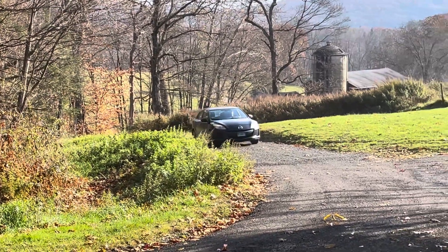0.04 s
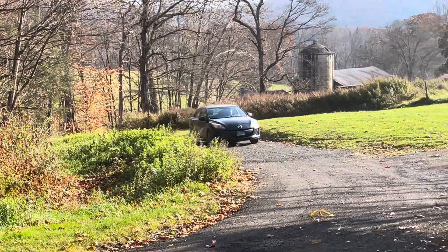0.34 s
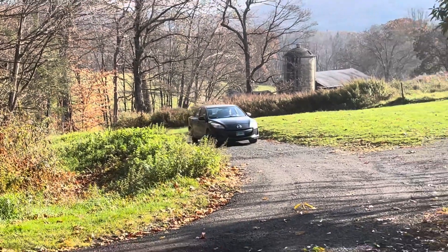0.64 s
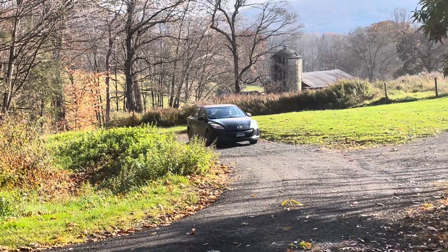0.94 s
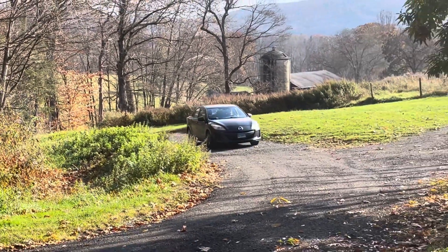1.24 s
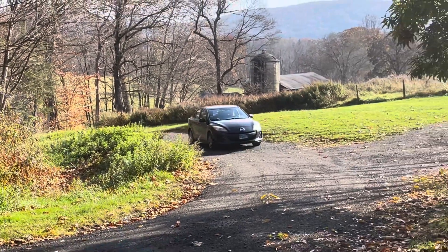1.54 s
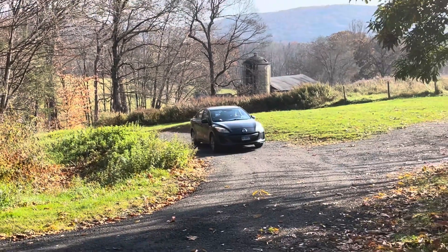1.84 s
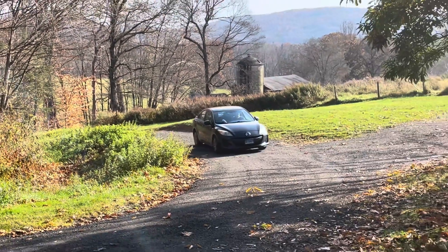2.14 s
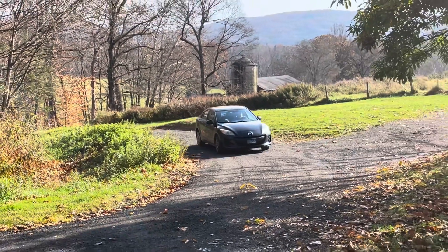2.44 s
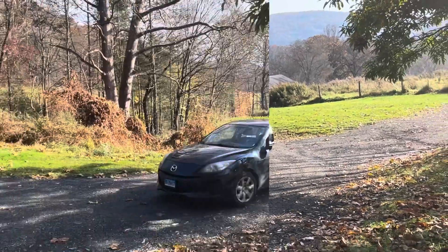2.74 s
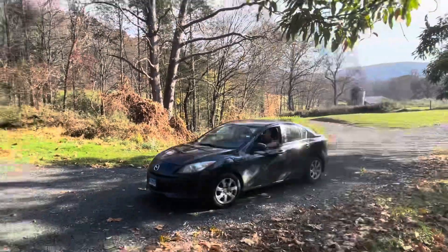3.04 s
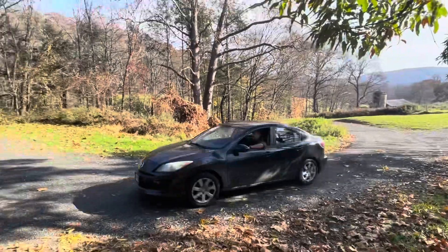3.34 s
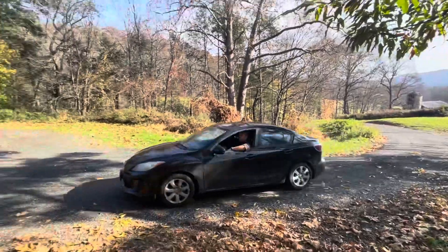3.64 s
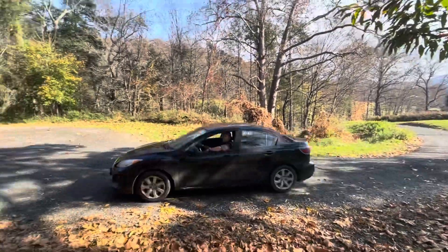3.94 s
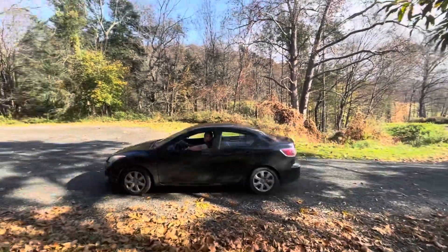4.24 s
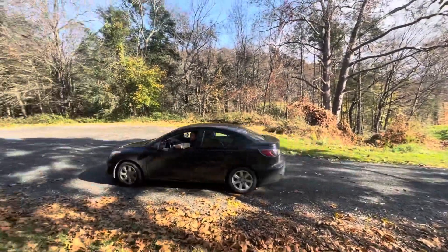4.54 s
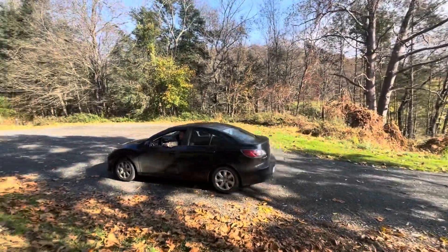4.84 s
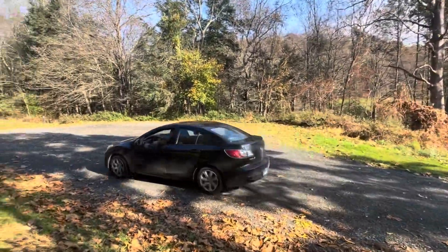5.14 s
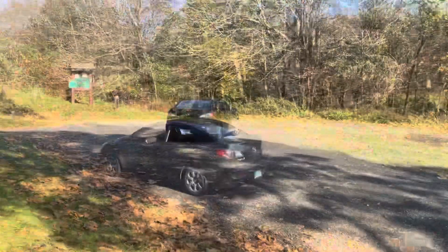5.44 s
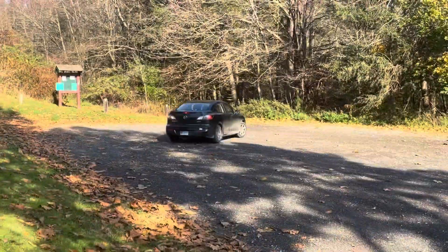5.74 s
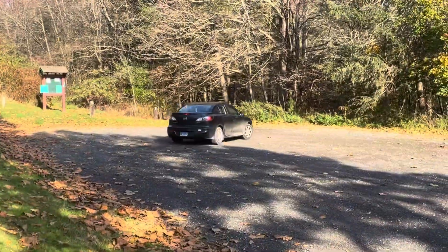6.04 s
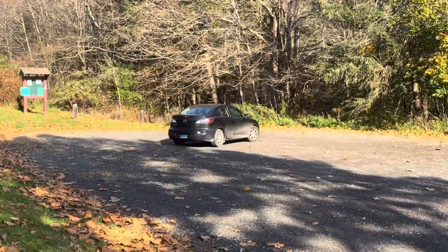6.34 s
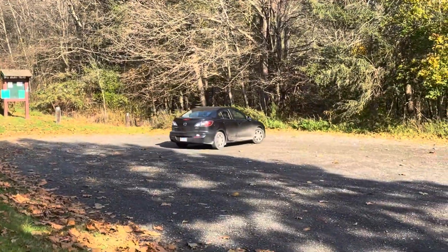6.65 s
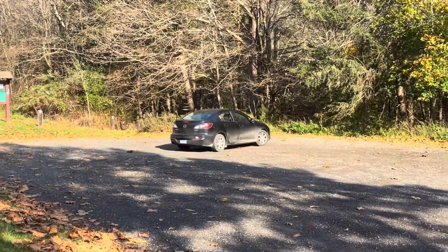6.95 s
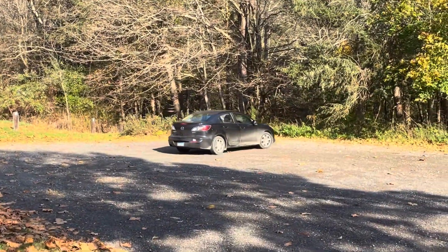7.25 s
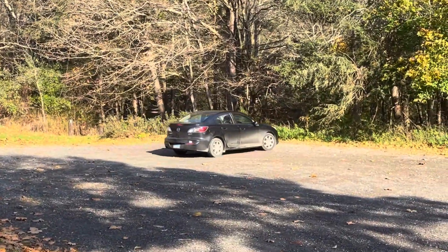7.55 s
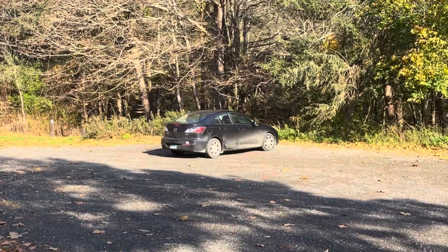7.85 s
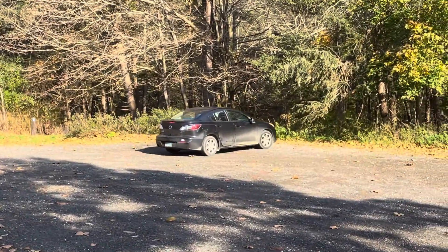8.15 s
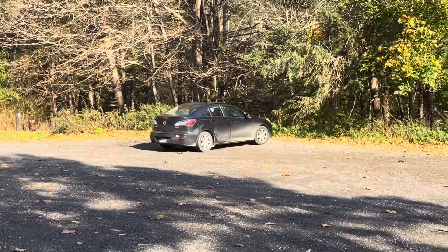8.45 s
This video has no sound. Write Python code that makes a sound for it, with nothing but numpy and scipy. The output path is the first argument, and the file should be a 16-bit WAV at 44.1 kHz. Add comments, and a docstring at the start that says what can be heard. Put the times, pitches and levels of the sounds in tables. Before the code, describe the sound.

Gravel crunches under the tyres of a slowly approaching car, with single stones popping out and scattering grit. The sound swells as the car passes close to the microphone at the side of a country drive, bringing sharp snaps, low tyre rumble, soft thuds and a low-revving engine. It then recedes to a soft, blurred grinding. Nearby trees return a slight echo, and a distant bird chirps briefly at the close.

```python
"""A small car creeps along a gravel drive in the country, heard in stereo from the verge.
It comes from afar, rolls close by the microphone about four seconds in, then draws away.
The tyres grind a bed of small stones and now and then pinch a big one until it pops out and scatters grit.
Under the crunch the tyres rumble and the engine hums at low revs. The trees return a faint echo,
and distant birds chirp at the end."""
import sys
import numpy as np
from scipy import signal
from scipy.fft import rfft, irfft
from scipy.io import wavfile

SR = 44100
rng = np.random.default_rng(int(sys.argv[2]) if len(sys.argv) > 2 else 0)


def to_wav(s):
    """Save 16-bit WAV."""
    ch = np.atleast_2d(s).T  # columns
    pcm = np.round(np.clip(ch, -1, 1) * 32767)  # PCM
    wavfile.write(sys.argv[1], SR, pcm.astype(np.int16))


N = 374850
TIME = np.arange(N) / SR
ABREAST_S = 4.03   # the car is level with the microphone
# how loudly the tyres work the gravel: time_s, level_db
TYRE_LEVEL = [(0.0, -47.5), (0.52, -47), (2.65, -47), (3.05, -36.5), (3.57, -35), (4.28, -34.5),
              (4.52, -35), (4.8, -38.5), (5.16, -35), (5.42, -43.5), (5.59, -47), (6.25, -48), (7.15, -51),
              (7.67, -49.5), (8.17, -53.5), (8.5, -54)]


def from_db(db):
    """Decibels to gain."""
    return 10 ** (np.asarray(db) / 20)


def rms_one(x):
    """Scale to unit power."""
    return x / np.sqrt(np.mean(x ** 2) + 1e-20)


def peak_one(x):
    """Scale to unit peak."""
    return x / (np.abs(x).max() + 1e-20)


def swell(centre_s, width_s):
    """A bell-shaped rise and fall."""
    return np.exp(-.5 * ((TIME - centre_s) / width_s) ** 2)


def follow(curve, time_s=TIME):
    """Value of a curve table at the given moments."""
    return np.interp(time_s, *np.transpose(curve))


def drift(rate_hz):
    """Slow random wander with a spread of 1."""
    step = 40
    pole = np.exp(-2 * np.pi * step * rate_hz / SR)
    slow = signal.lfilter([1], [1, -2 * pole, pole * pole], rng.standard_normal(N // step + 2002))[2000:]
    return np.interp(np.arange(N) / step, np.arange(len(slow)), rms_one(slow))


def band(x, edges_hz, kind="band", order=2):
    """Butterworth filter."""
    return signal.sosfilt(signal.butter(order, edges_hz, kind, fs=SR, output="sos"), x + 1e-18)


def colour(x, points):
    """Minimum-phase filter that follows points of frequency_hz, gain_db."""
    size = 8192
    hz, db = np.transpose(points)
    grid = np.maximum(np.arange(size // 2 + 1) * SR / size, 1)
    cepstrum = irfft(np.log(from_db(np.interp(np.log(grid), np.log(hz), db))))
    cepstrum[1:size // 2] *= 2
    cepstrum[size // 2 + 1:] = 0
    return signal.oaconvolve(x, irfft(np.exp(rfft(cepstrum))))[:N]


def reflections(x, t60_s, delay_s):
    """Many small echoes that die away; keeps the power."""
    t = np.arange(SR // 2) / SR
    echoes = rng.standard_normal(len(t)) * from_db(-60 * t / t60_s)
    return signal.oaconvolve(x, np.pad(echoes / np.linalg.norm(echoes), (int(delay_s * SR), 0)))[:N]


def lean(channels, balance):
    """Tip each part of the spectrum to the left or right."""
    half = np.array(balance) * [1, .5]
    return np.array([colour(channels[0], half), colour(channels[1], half * [1, -1])])


def stage_gains():
    """Equal-power gains of the car's approach, pass, departure and far end of the drive."""
    # each stage gives way to the next: start_s, end_s
    crossfades = [(2.52, 2.96), (5.34, 5.9), (6.2, 7.0)]
    begun = [np.ones(N)] + [np.interp(TIME, span, [0, 1]) for span in crossfades] + [np.zeros(N)]
    return np.sqrt(np.maximum(-np.diff(begun, axis=0), 0))


def countryside(level_db):
    """Faint air over fields and woods, reaching the microphone from all sides."""
    # open country: frequency_hz, gain_db
    air = [(25, -8), (60, 11), (150, -4.5), (450, -4.5), (900, -7), (1900, -9.5), (2600, -52)]
    return from_db(level_db) * np.array([rms_one(colour(rng.standard_normal(N), air)) for _ in range(2)])


def birds():
    """Short, quavering chirps from the wood, each swelling and fading as it glides."""
    # distant calls: start_s, length_s, start_hz, end_hz, level_db
    chirps = [(8.2, .08, 2510, 2570, -60), (8.363, .05, 3850, 4000, -64), (8.418, 0.038, 3850, 3540, -58),
              (8.465, .045, 3680, 3380, -58)]
    quaver, out = 1 + 0.013 * drift(92), np.zeros(N)
    for start_s, length_s, start_hz, end_hz, db in chirps:
        along = np.clip((TIME - start_s) / length_s, 0, 1)
        hz = (start_hz + (end_hz - start_hz) * along) * quaver
        out += from_db(db) * 4 * along * (1 - along) * np.sin(2 * np.pi * np.cumsum(hz) / SR)
    return out + from_db(-6) * reflections(out, t60_s=.15, delay_s=0.022)


def fan(pitch_hz, waver_db):
    """A faint hum, probably the cooling fan, plainest just after the car goes by."""
    db = follow(TYRE_LEVEL) - 17.5 + 18 * swell(centre_s=4.68, width_s=0.076) + waver_db * drift(3.4)
    hz = pitch_hz * (1 + 0.0091 * drift(10.5))
    return from_db(db) * np.sin(2 * np.pi * np.cumsum(hz) / SR)


def engine(gain_db, waver_db):
    """Low, unsteady orders of the crankshaft; their mix changes as the tail faces the microphone."""
    # engine speed and hum: time_s, turns_per_s, level_db
    revs = [(0, 25, -49), (.2, 25.2, -46), (.55, 26, -55), (2.1, 20, -58.5), (2.45, 20.3, -66),
            (2.6, 27.8, -54.5), (3, 27.8, -41.5), (3.2, 29.2, -39), (3.5, 30.4, -45), (3.78, 28.9, -36),
            (4.02, 25, -55), (4.55, 20, -56), (4.8, 21.3, -43.5), (5.05, 24, -46), (5.35, 27.4, -45.5),
            (5.6, 26, -63.5), (8.5, 24, -95)]
    # crankshaft orders: multiple, front_db, behind_db
    orders = [(3, -5, 0), (6, 2, -5), (7.5, -6, 0.5), (9, -14, -4.5)]
    time_s, *columns = np.transpose(revs)
    turns_per_s, hum_db = (np.interp(TIME, time_s, column) for column in columns)
    angle = 2 * np.pi * np.cumsum(turns_per_s * (1 + 0.0037 * drift(9.3))) / SR
    behind = np.clip((TIME - ABREAST_S) / 0.59, 0, 1)
    out = np.zeros(N)
    for multiple, front_db, behind_db in orders:
        db = hum_db + gain_db + front_db + (behind_db - front_db) * behind + waver_db * drift(5.6)
        out += from_db(db) * np.sin(multiple * angle)
    return np.sqrt(2) * out


def rumble(approach, passing, departure, far_end):
    """Tyres and body shaken by the uneven ground."""
    # rumble at a distance and close by: frequency_hz, gain_db
    far_colour = [(15, -9), (25, -29), (43, -2.5), (75, 1), (119, -5), (155, -6.5), (200, -11),
                  (400, -22.5), (520, -32.5), (880, -120)]
    near_colour = [(20, -39), (35, -12.5), (55, -9.5), (82, 5), (115, -2), (170, -5.5), (240, -8.5),
                   (330, -15.5), (450, -29.5), (800, -53.5)]
    far = from_db(1.5) * rms_one(colour(rng.standard_normal(N), far_colour))
    near = from_db(-4) * rms_one(colour(rng.standard_normal(N), near_colour))
    leaving = from_db(-2) * departure + from_db(-3.5) * far_end
    return approach * far + passing * near + leaving * band(far, 42, "high", order=3)


def thuds():
    """A wheel drops into a rut and the body booms on its springs, at an unsteady pitch."""
    # ruts in the drive: centre_s, level_db, width_s, pitch_hz
    ruts = [(0.112, -36.5, 0.031, 53.5), (0.19, -41, 0.03, 53.9), (0.918, -34.5, 0.02, 53.9),
            (4.038, -36, 0.1, 72), (4.38, -41, 0.026, 66.3), (6.147, -41.5, 0.025, 76.5)]
    clock = np.cumsum(1 + 0.2085 * drift(24.4)) / SR
    return np.sqrt(2) * sum(from_db(db) * swell(centre_s, width_s) * np.sin(2 * np.pi * hz * clock)
                            for centre_s, db, width_s, hz in ruts)


def scrubs():
    """Stones slide under the turning tyres: first a hollow grind, then a hiss of fine grit."""
    # slides on the bend: centre_s, width_s, level_db, low_hz, high_hz
    slides = [(2.25, .25, -50.5, 1170, 1450), (2.822, .15, -64, 4500, 8500)]
    return sum(from_db(db) * swell(centre_s, width_s) * rms_one(band(rng.standard_normal(N), edges_hz))
               for centre_s, width_s, db, *edges_hz in slides)


def small_stones(count, gain_db, spread_db):
    """Random hits under the tread that follow the tyres' level: start_s, level_db, pitch_hz."""
    when, size, pitch = rng.random((count, 3)).T
    start_s = when * N / SR
    return zip(start_s, follow(TYRE_LEVEL, start_s) + gain_db + spread_db * size ** 2, 1700 * 3.2 ** pitch)


def clinks(rows, t60_s):
    """Loose pebbles are struck and ring out; rows of start_s, level_db, pitch_hz."""
    out, t = np.zeros(N + SR), np.arange(SR // 25) / SR
    for start_s, db, hz in rows:
        start = int(start_s * SR)
        out[start:start + len(t)] += from_db(db - 60 * t / t60_s) * np.sin(2 * np.pi * hz * t)
    return out[:N]


def chips(rows, t60_s, fractures_per_s=2000):
    """A chip of stone snaps: one fracture, then a quick run of weaker ones; rows as for clinks."""
    out, t = np.zeros(N + SR), np.arange(SR // 50) / SR
    for start_s, db, hz in rows:
        size, chance = rng.random((2, len(t)))
        fractures = (2 * size - 1) * (chance < fractures_per_s / SR) * from_db(-3.5 - 60 * t / t60_s)
        fractures[0] = 1
        start = int(start_s * SR)
        out[start:start + len(t)] += from_db(db) * peak_one(band(fractures, [hz / 1.21, hz * 1.21]))
    return out[:N]


def small_pops(count, until_s, gain_db, spread_db, snap_db, grit_db):
    """Rows for pops: lesser stones at random moments, following the tyres' level."""
    when, size, pitch = rng.random((count, 3)).T
    starts_s = (np.arange(count) + when) / count * until_s
    levels_db = follow(TYRE_LEVEL, starts_s) + gain_db + spread_db * size
    return [(*row, snap_db, grit_db) for row in zip(starts_s, levels_db, 850 * 1.48 ** pitch)]


def pops(rows, gain_db, squeeze_s=0.018, grit_per_s=1500, grit_t60_s=0.11, rebound_t60_s=0.027):
    """A pinched stone crackles, shoots free with a knock and a snap, then rattles its neighbours."""
    # treble of a snap at the microphone: frequency_hz, gain_db
    snap_colour = [(6200, 4), (7500, -5), (12500, -6), (14000, -21)]
    lead = int(squeeze_s * SR)
    t = np.arange(-lead, SR // 8) / SR   # zero as the stone gives way
    knocks, snaps = np.zeros((2, N + SR))
    for release_s, db, hz, snap_db, grit_db in rows:
        size, chance = rng.random((2, len(t)))
        rattle = (2 * size - 1) * (chance < grit_per_s / SR) * (np.abs(t) > .002)
        rattle_db = np.where(t < 0, grit_db / 2 - 13.5, min(grit_db, -3) - 60 * t / grit_t60_s)
        # the freed stone chatters on the ground
        rebound = (t > 0) * from_db(-26.5 - 60 * np.abs(t) / rebound_t60_s) * rng.standard_normal(len(t))
        hits = from_db(rattle_db) * rattle + rebound
        hits[lead] = 1
        knock = peak_one(band(hits, [hz / 1.38, hz * 1.38]))
        thump = from_db(-21.5) * peak_one(band(hits, [170, 403]))   # the tread springs back
        snap = peak_one(band(hits * from_db(-60 * np.abs(t) / 0.93), [1053, 3586], order=1))
        start = max(int(release_s * SR) - lead, 0)
        knocks[start:start + len(t)] += from_db(db) * (knock + thump)
        snaps[start:start + len(t)] += from_db(db + snap_db + 12) * snap
    return from_db(gain_db) * (knocks[:N] + colour(snaps[:N], snap_colour))


def single_stones(near):
    """Pops, chips and flicked pebbles stand out of the crunch; distance dulls them."""
    # big stones pinched by a tyre: release_s, level_db, pitch_hz, snap_db, grit_db
    pinched = [(0.416, -35, 1200, -28, -14), (0.442, -32.5, 1360, -19, -12), (0.61, -27.5, 1180, -32, -10),
               (0.655, -28.5, 1190, -25, -8), (0.694, -26.5, 1240, -31, -14), (0.75, -29, 990, -17, -12),
               (0.769, -26, 1150, -26, -19), (0.856, -27.5, 1190, -20, -5), (1.028, -34, 1300, -26, -16),
               (1.132, -29, 1150, -26, -9), (1.237, -25, 950, -14, -22), (1.28, -21.5, 1140, -31, -16),
               (1.319, -26.5, 935, -16, -8), (1.435, -27.5, 960, -12.5, 7), (1.455, -27, 950, -16, -4),
               (1.675, -25, 1300, -19, -6), (1.877, -21, 1230, -20, -19), (1.921, -23.5, 1070, -20, -19),
               (1.955, -26.5, 1130, -19, -10), (2.023, -25, 900, -17, -11), (2.295, -19.5, 1090, -20, -19),
               (2.39, -17.5, 1090, -22, -19), (2.418, -18.5, 1000, -14, -8), (2.83, -22, 1160, -20, -18),
               (2.882, -19, 990, -26, -14), (2.891, -17.5, 1190, -25, -6), (2.9, -13.5, 1260, -15, -11),
               (3.095, -17.5, 1000, -30, -7), (3.428, -14, 940, -25, -10), (3.495, -18.5, 690, -30, -8),
               (3.516, -16.5, 960, -25, 2), (3.539, -18, 970, -32, -18), (3.577, -22, 850, -10, -14),
               (3.678, -25, 960, -20, -11), (3.83, -14, 1040, -27, -18), (3.864, -20, 1040, -22, -6),
               (3.933, -20, 1500, -24, -16), (4.007, -16, 1350, -16, -8), (4.064, -21, 920, -30, -6),
               (4.334, -16, 1070, -24, -12), (4.36, -20.5, 1050, -8, 4), (4.384, -5, 1000, -19, -7.5),
               (4.417, -12.5, 1170, -22, -3), (4.531, -15.5, 940, -34, -8), (4.589, -9.5, 1140, -24, -6),
               (4.602, -19, 1100, -24, -17), (4.637, -10, 1120, -24, -6), (4.671, -21.5, 1000, -11, 0),
               (4.694, -13.5, 1320, -18.5, -5), (4.722, -23, 1400, -20, -15),
               (4.827, -14, 1210, -17, -10.5), (4.951, -18.5, 1440, -24, -18),
               (5.006, -16.5, 1280, -24, -11), (5.16, -19, 945, -26, -2), (5.222, -17, 1100, -28, 5),
               (5.363, -16.5, 1230, -33, -3), (5.815, -30, 1140, -12, -2), (6.003, -30, 1220, -9.5, -9),
               (6.056, -28, 1180, -25, -4.5), (6.145, -23, 1090, -24, -6.5), (6.285, -28, 1080, -15, -4),
               (6.408, -32, 1200, -6.5, -13), (6.492, -30, 1280, -22, -6), (6.995, -30, 1020, -19, -7),
               (7.472, -27.5, 1450, -15, -15), (7.856, -40.5, 1600, -2, -12), (8.427, -33, 950, -24, -21)]
    # chips that break off: start_s, level_db, pitch_hz
    broken = [(0.927, -32, 5940), (1.5463, -32, 3530), (3.578, -30, 3700), (3.645, -22.5, 6000),
              (3.7155, -25, 4300), (3.9518, -26.5, 4360), (4.119, -29, 3800), (4.153, -23, 5600),
              (4.376, -15, 5020), (4.3867, -22, 3980), (5.1193, -23, 3960), (6.431, -41, 3900),
              (8.047, -42, 3600)]
    lesser = small_pops(count=64, until_s=6.5, gain_db=4, spread_db=12, snap_db=-26, grit_db=-10.5)
    stones = pops(pinched + lesser, gain_db=-1.5)
    stones += chips(broken, t60_s=0.033)
    stones += chips(small_stones(count=160, gain_db=-10, spread_db=12), t60_s=0.015)
    stones += clinks(small_stones(count=220, gain_db=-11, spread_db=11.5), t60_s=0.02)
    return near * stones + (1 - near) * band(stones, 5470, "low", order=4)


def contacts(per_s, spread_db=2.5):
    """Stone-on-stone clicks at random moments: many weak ones, a few strong."""
    sizes = from_db(spread_db * np.minimum(rng.exponential(1, N), 4.5)) * rng.choice([-1, 1], N)
    return sizes * (rng.random(N) < per_s / SR)


def gravel_bed(per_s, clump_db, crack_db, knock_db, wash_db):
    """White crunch: each stone rings a few cycles at a pitch of its size, in clumps as the tread bites."""
    rate = per_s * from_db(clump_db * drift(24))
    clicks = contacts(rate)
    edges_hz = np.geomspace(250, 16000, 15)
    shares = np.diff(edges_hz ** .75)   # small stones outnumber big ones, so the treble is the smoothest
    click_band = rng.choice(len(shares), N, p=shares / shares.sum())
    rings = sum(rms_one(band(clicks * (click_band == k), edges_hz[k:k + 2], order=1)) * np.sqrt(width)
                for k, width in enumerate(np.diff(edges_hz)))
    cracks = rms_one(band(contacts(rate / 20), 5500, "low"))   # sharp contacts, many pitches at once
    when, size, pitch = rng.random((3, 1500))
    knocks = rms_one(clinks(zip(when * N / SR, 18 * size ** 2, 650 * 4 ** pitch), t60_s=0.031))
    wash = rng.standard_normal(N)
    return rms_one(rings) + from_db(crack_db) * cracks + from_db(knock_db) * knocks + from_db(wash_db) * wash


def graded(bed, spectrum, coarse_db, pebble_db, grit_db):
    """The gravel, coloured and split into coarse stones, pebbles and grit, each at its own level."""
    sound = colour(bed, spectrum)
    return (from_db(coarse_db) * rms_one(band(sound, 850, "low", order=5))
            + from_db(pebble_db) * rms_one(band(sound, [850, 2200], order=3))
            + from_db(grit_db) * rms_one(band(sound, 2200, "high", order=5)))


def crunch(approach, passing, departure, far_end):
    """The tyres grind the gravel; distance blurs the single stones as the car leaves."""
    # gravel coming, close in front, close behind, leaving and far off: frequency_hz, gain_db
    coming_colour = [(220, -23), (430, -1.5), (720, -0.5), (950, -1.5), (1350, 5), (1800, -8), (2050, -5.5),
                     (2500, -9.5), (3400, -9.5), (4200, -15.5), (6400, -18), (7300, -34), (10000, -26),
                     (13000, -39)]
    front_colour = [(250, -6), (400, -12), (520, -3.5), (760, 0), (950, 5), (1180, 0), (1300, -1.5),
                    (1460, -2.5), (1650, 0.5), (2080, -3.5), (2500, -10), (3400, -18.5), (4400, -12),
                    (5800, -18), (6350, -12), (7300, -23), (13000, -29)]
    behind_colour = [(250, -3), (420, -6), (720, 3.5), (1000, 5.5), (1350, 4.5), (1750, -2), (2200, -3.5),
                     (2700, -11.5), (3300, -13), (4000, -12.5), (5000, -11.5), (5500, -19), (6280, -9.5),
                     (7000, -20), (13000, -29.5)]
    leaving_colour = [(220, -2), (420, -3.5), (780, -9), (1000, 6.5), (1350, 8.5), (1950, -9), (2400, -6),
                      (3600, -7), (4300, -13), (6400, -13), (7200, -35.5), (10000, -22), (13000, -45.5)]
    far_colour = [(220, -1.5), (420, -2.5), (880, -0.5), (1100, -4.5), (1400, -2.5), (1950, -7),
                  (2900, -0.5), (3700, -0.5), (4300, -4.5), (6400, -5), (7200, -24), (10000, -14.5),
                  (13000, -25.5)]
    bed = gravel_bed(per_s=11000, clump_db=3, crack_db=-8.5, knock_db=-14.5, wash_db=-7.5)
    blur = rng.standard_normal(N)
    nearing_db = 1.04 * (TIME - 1.5)   # the grit grows clearer as the car comes nearer
    thrown_db = -3 * np.clip(TIME - ABREAST_S, -1, 1)   # low grinding is thrown forwards, so it fades
    behind = np.interp(TIME, [3.93, 4.37], [0, 1])   # the tail turns to the microphone
    gravel = approach * graded(bed, coming_colour, -5.4, -5.2, nearing_db - 7.7)
    gravel += passing * (1 - behind) * graded(bed, front_colour, thrown_db - 8.7, -4.7, -8)
    gravel += passing * behind * graded(bed, behind_colour, thrown_db - 9.6, -5.3, -7.6)
    gravel += departure * graded(bed + 2.7 * blur, leaving_colour, -9.5, -4.5, -7)
    gravel += far_end * graded(bed + blur, far_colour, -10.5, -5, -7)
    return band(gravel, 12950, "low", order=24)


def rolling(stages):
    """The tyres on the drive: crunch and rumble rise and fall together, with scrubs and thuds."""
    return from_db(follow(TYRE_LEVEL)) * (crunch(*stages) + rumble(*stages)) + scrubs() + thuds()


def scene():
    """The drive in stereo from the verge; the trees return a faint echo of the stones."""
    # stereo width, far and near; a thin band near 7 kHz (far) and above 13 kHz (near) sounds very wide:
    # frequency_hz, side_gain_db
    far_side = [(25, -11), (70, -27), (250, -52), (500, -24), (1100, -19), (1900, -9), (2500, -21),
                (6200, -79), (7000, 17.5), (9000, 2), (10500, -9)]
    near_side = [(60, -19), (210, -12), (450, -3.5), (1000, -11), (1800, -6), (2500, -5), (3400, 6.5),
                 (4900, -7.5), (5800, 1), (6400, -1), (7500, -1), (9300, 1.5), (11300, -30), (13600, 15)]
    # balance, far and near: frequency_hz, left_over_right_db
    far_balance = [(150, -0.5), (1250, 0.9), (1520, 4), (1770, -7.5), (2100, -1.5)]
    near_balance = [(250, 0.5), (480, -1.5), (700, 1), (1000, -1), (3500, -3), (6500, 0), (8500, 6.5),
                    (10500, 1.5)]
    stages = stage_gains()
    near = stages[1] ** 2
    stones = single_stones(near)
    hum = engine(gain_db=-3.5, waver_db=0.5) + fan(pitch_hz=232.4, waver_db=4)
    mid = rolling(stages) + stones + hum + birds()
    diffuse = rolling(stages) + reflections(stones + hum, t60_s=0.033, delay_s=0.00034)   # off the ground
    side = near * colour(diffuse, near_side) + (1 - near) * colour(diffuse, far_side)
    channels = mid + side, mid - side
    placed = near * lean(channels, near_balance) + (1 - near) * lean(channels, far_balance)
    trees = band(np.array([reflections(stones, t60_s=0.81, delay_s=0.015) for _ in range(2)]), 1240, "low")
    return placed + from_db(-13.5) * trees + countryside(level_db=-55)


def record(dry):
    """The top is cut steeply, 70 dB down from 15.8 kHz."""
    return signal.sosfilt(signal.cheby2(14, 70, 15800, fs=SR, output="sos"), dry)


dry = scene()
out = record(dry)
to_wav(out)
```